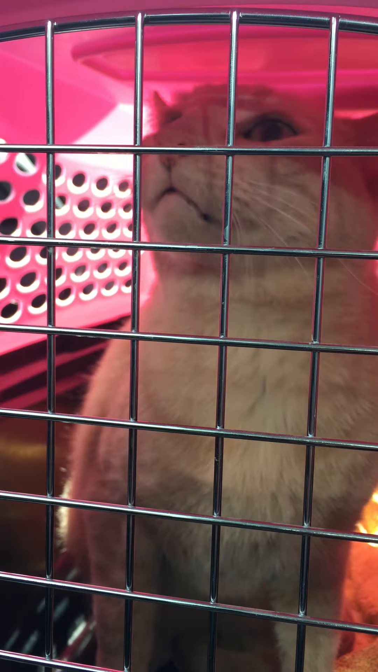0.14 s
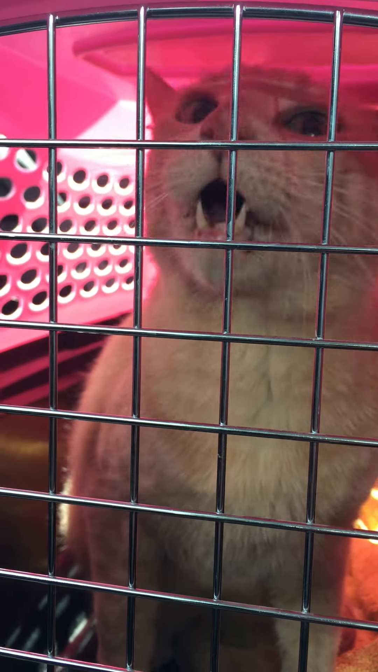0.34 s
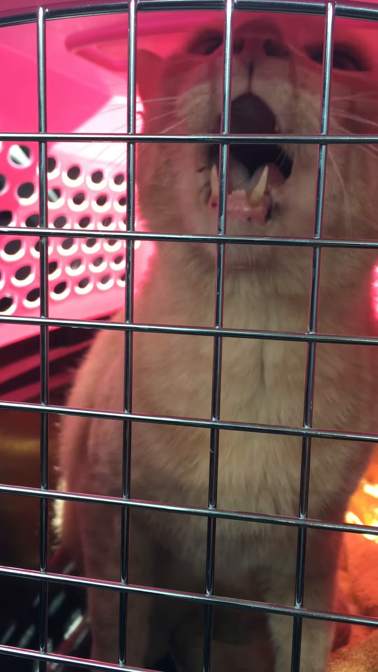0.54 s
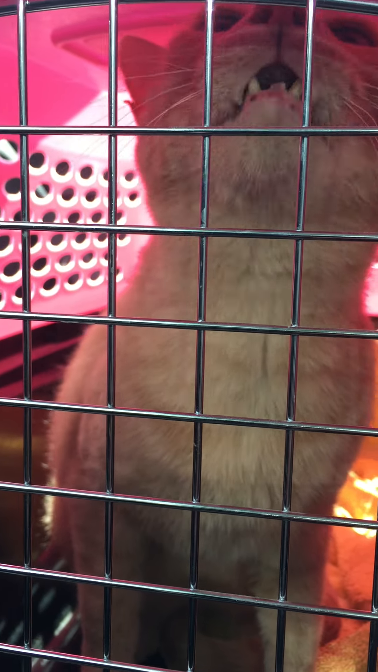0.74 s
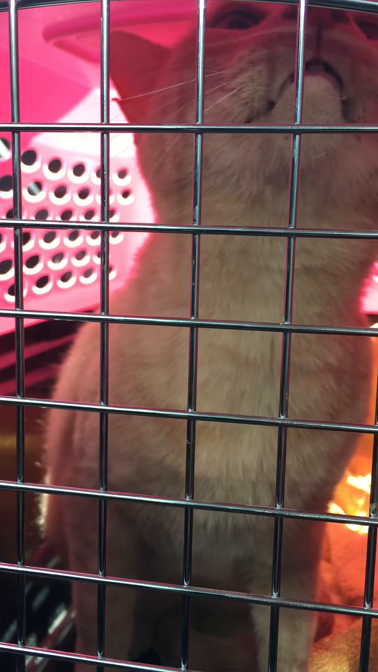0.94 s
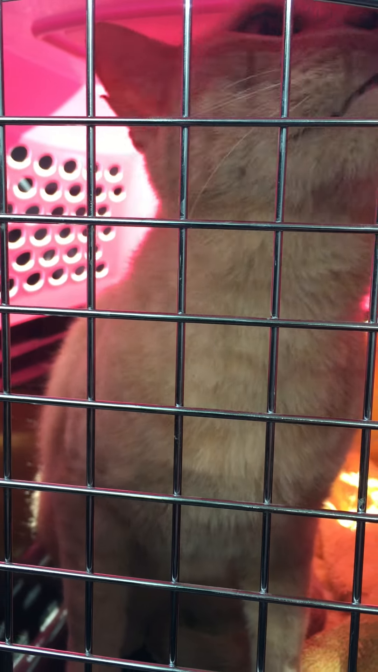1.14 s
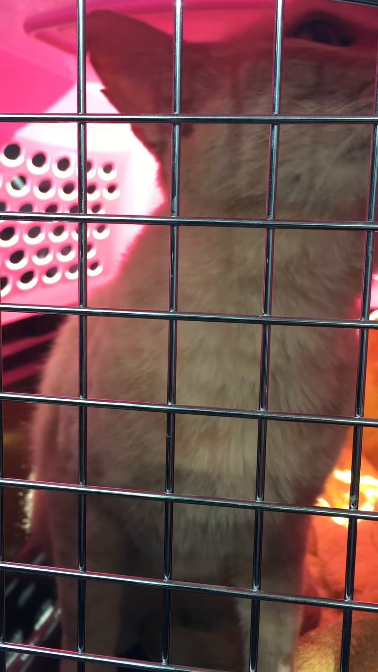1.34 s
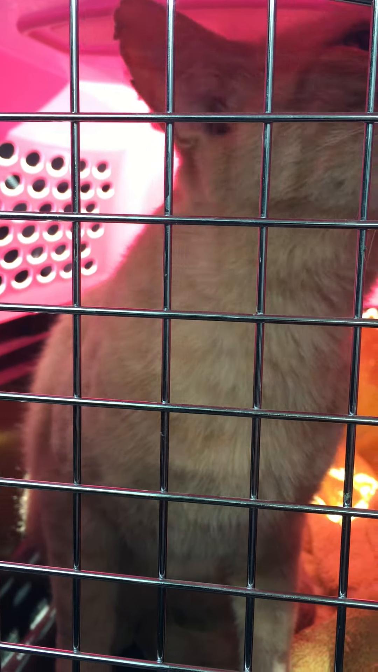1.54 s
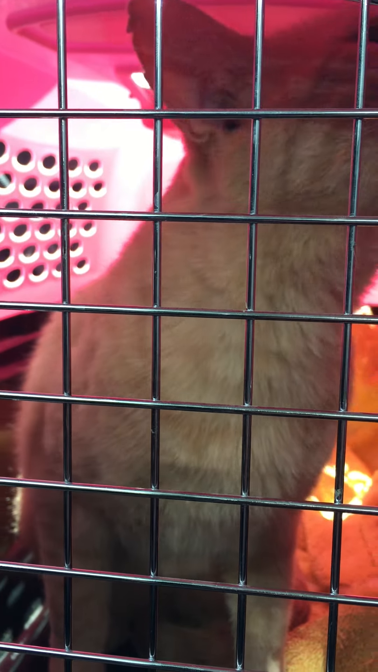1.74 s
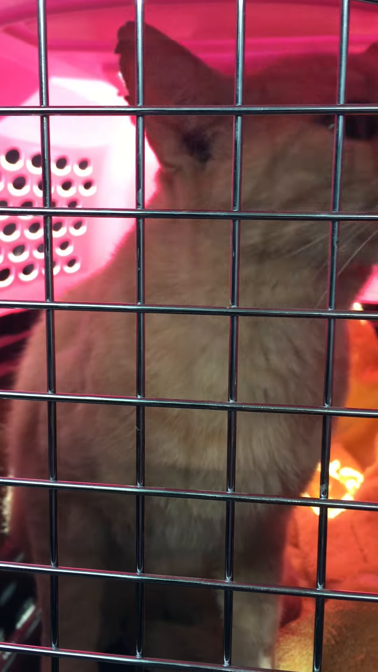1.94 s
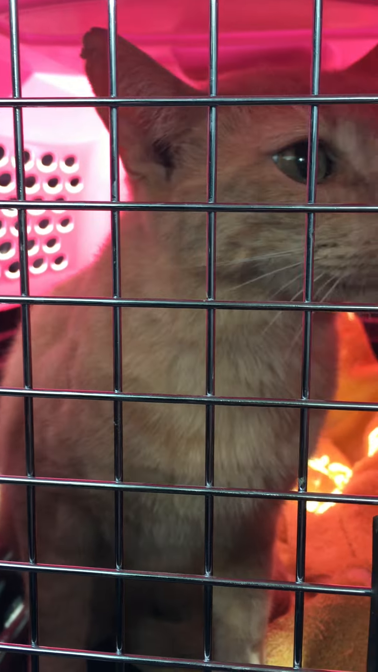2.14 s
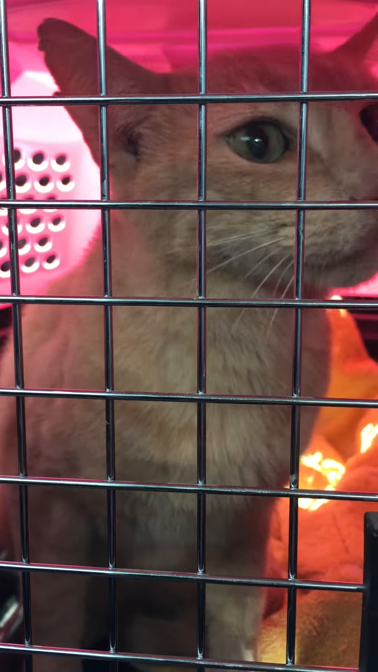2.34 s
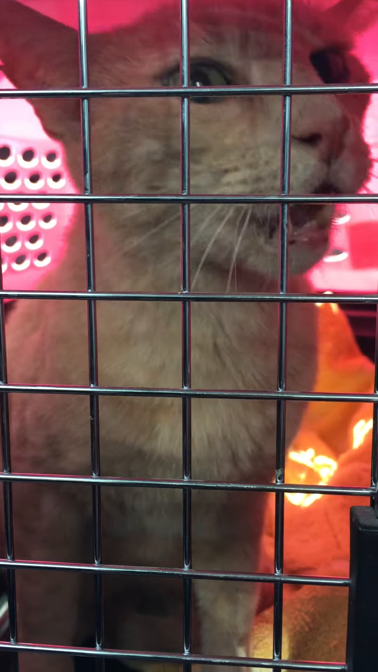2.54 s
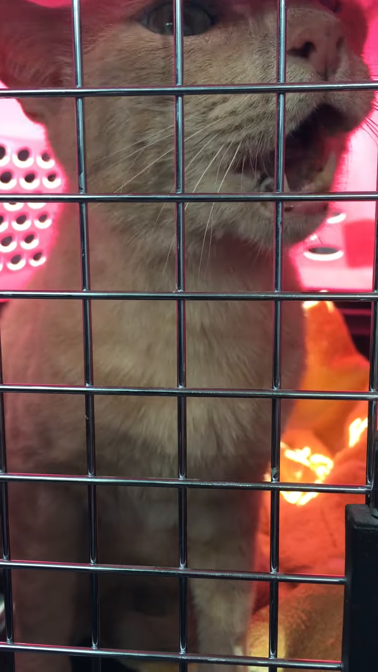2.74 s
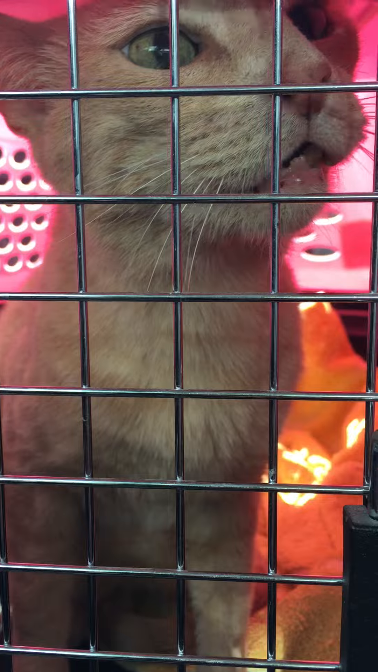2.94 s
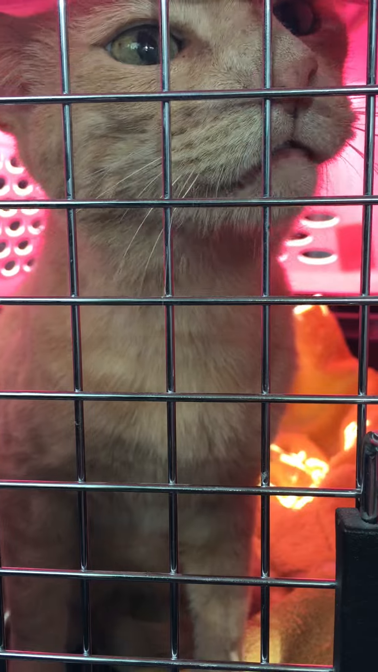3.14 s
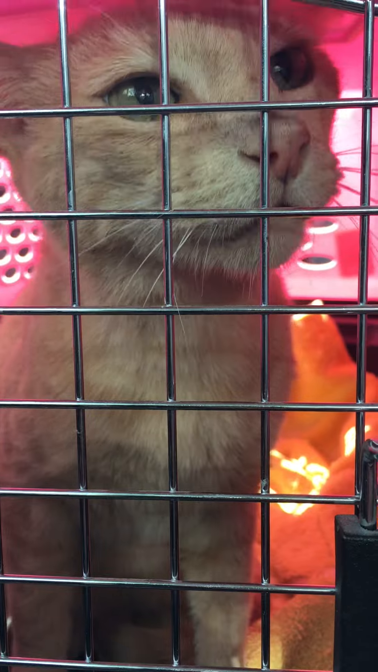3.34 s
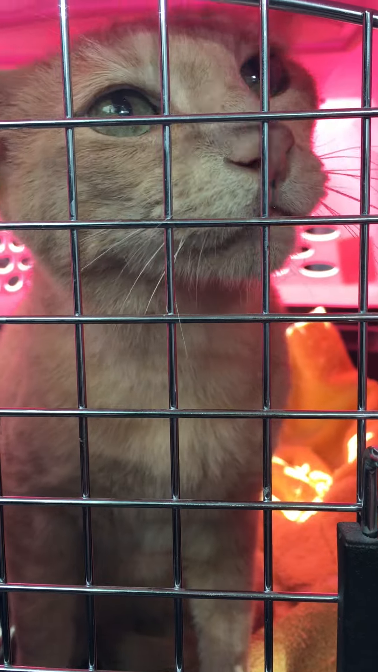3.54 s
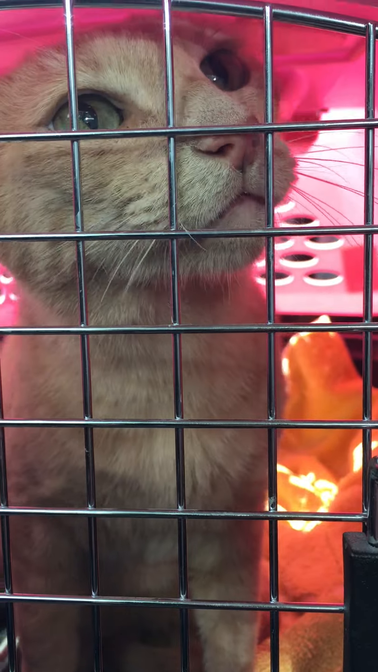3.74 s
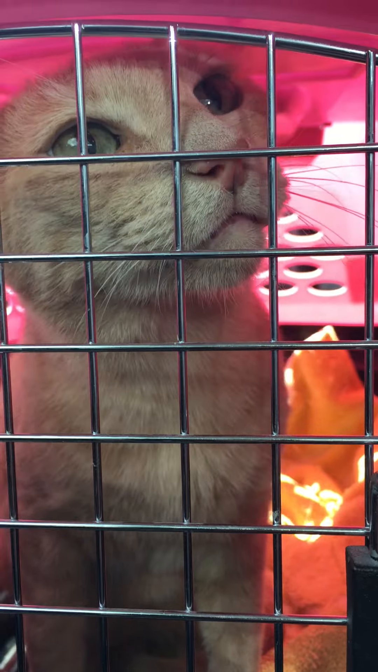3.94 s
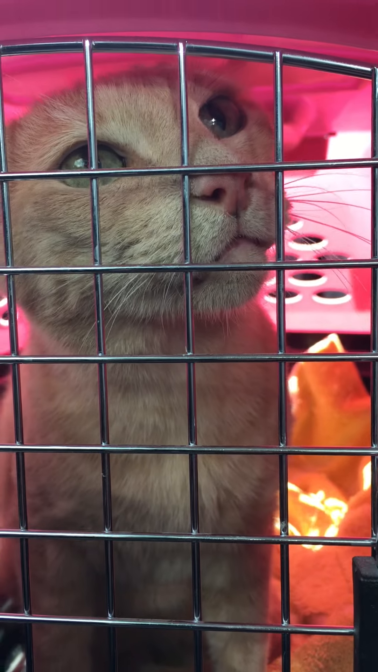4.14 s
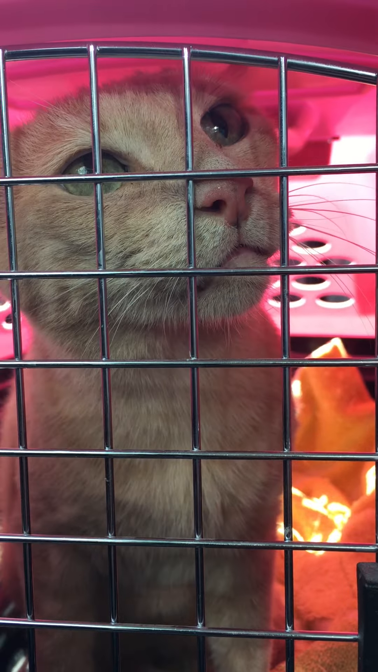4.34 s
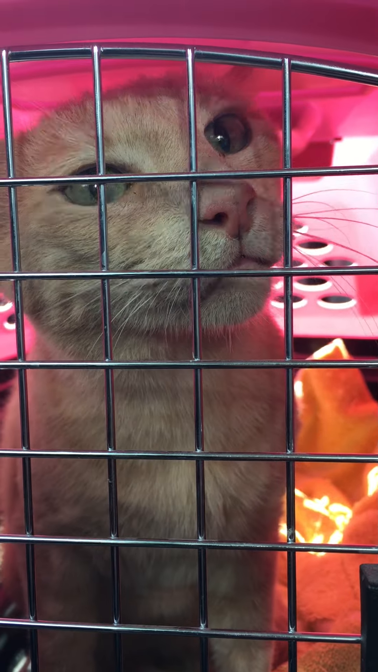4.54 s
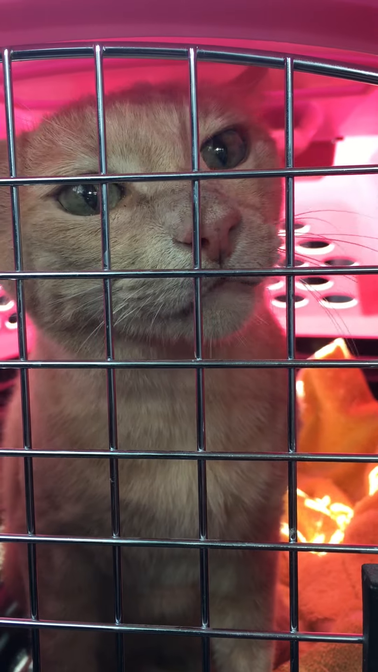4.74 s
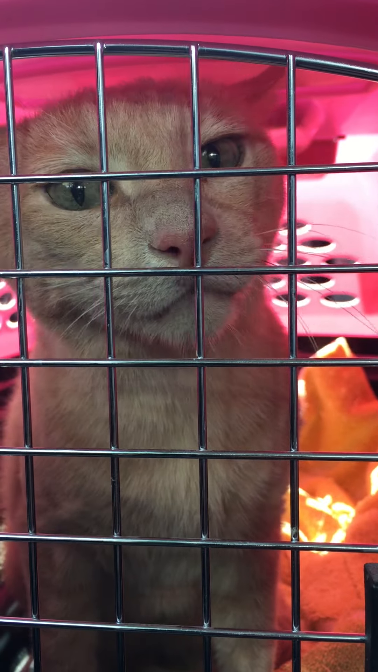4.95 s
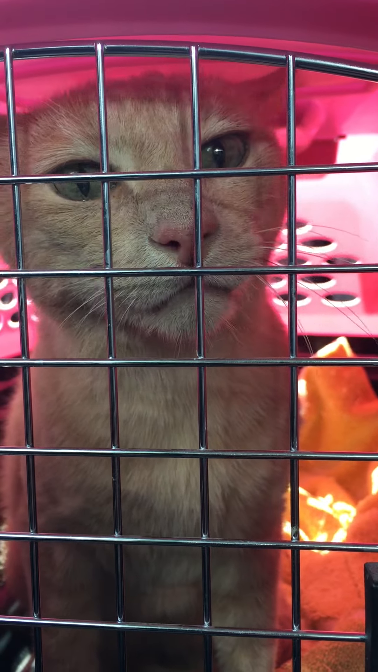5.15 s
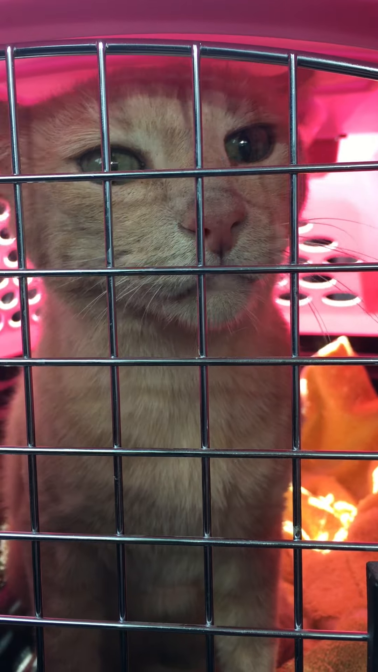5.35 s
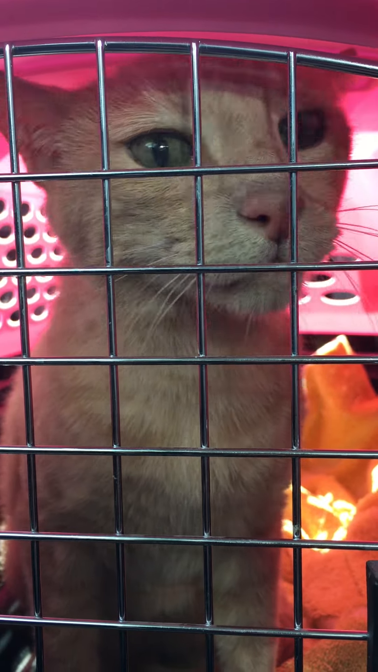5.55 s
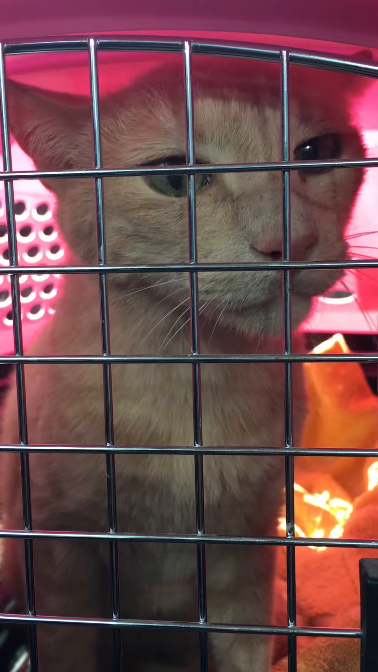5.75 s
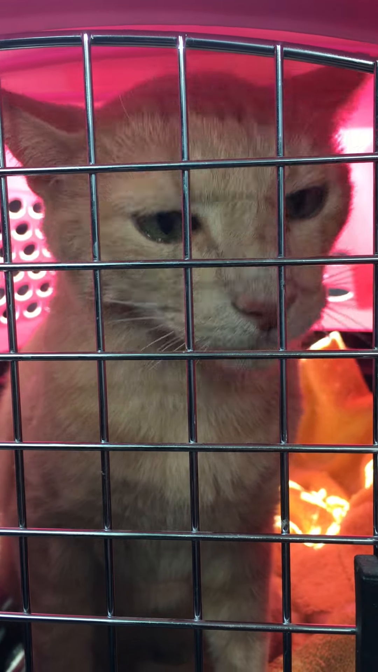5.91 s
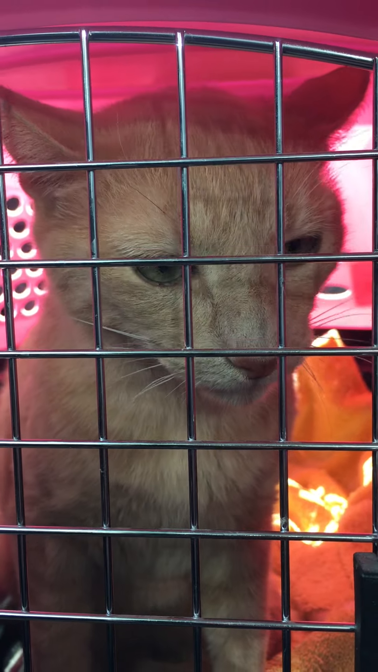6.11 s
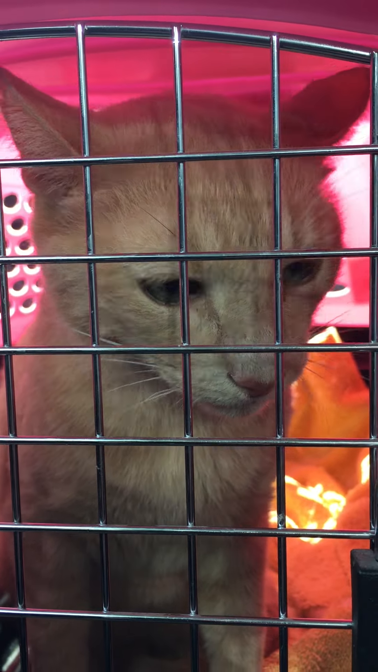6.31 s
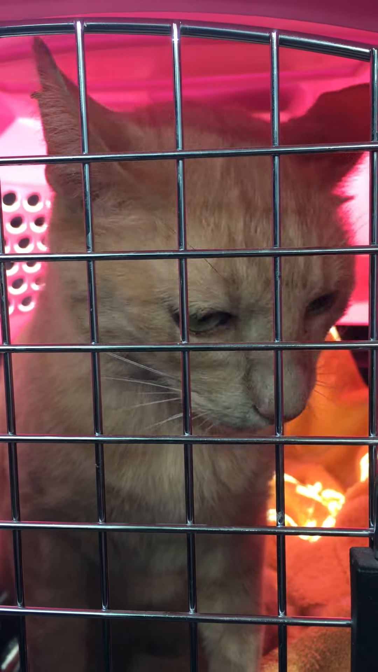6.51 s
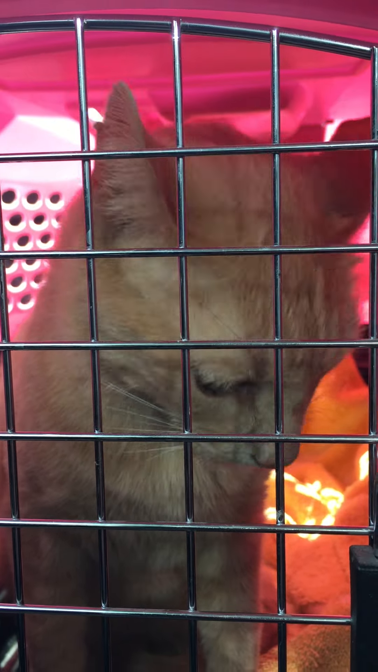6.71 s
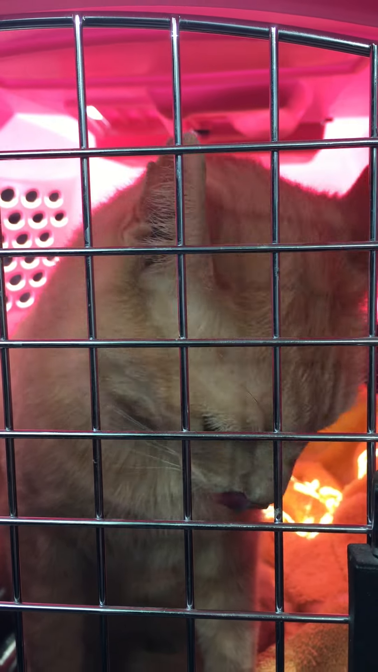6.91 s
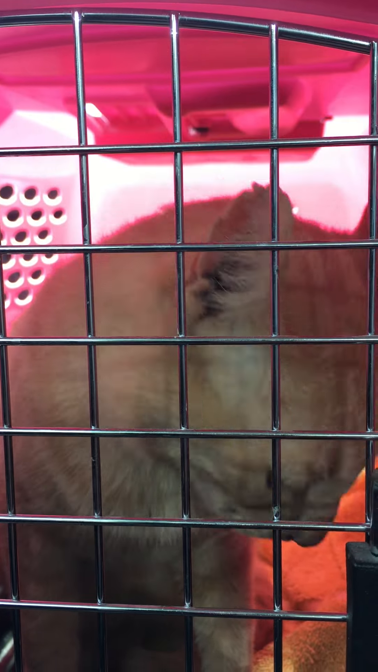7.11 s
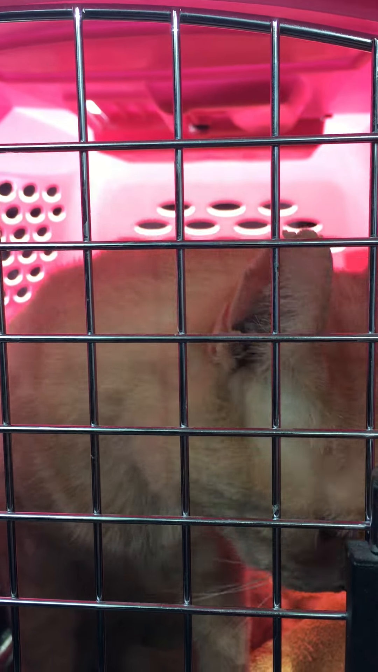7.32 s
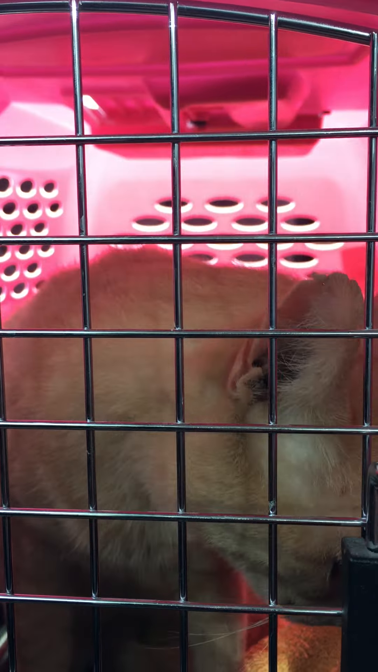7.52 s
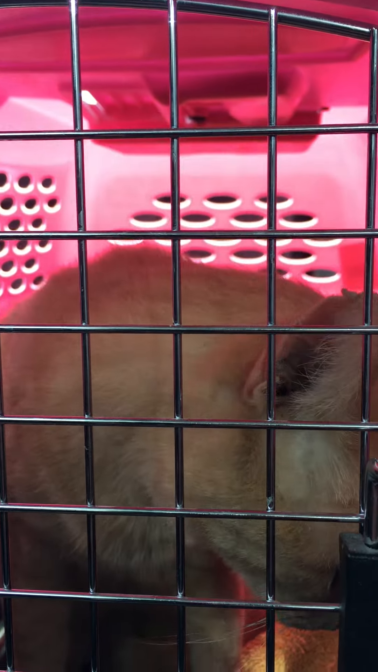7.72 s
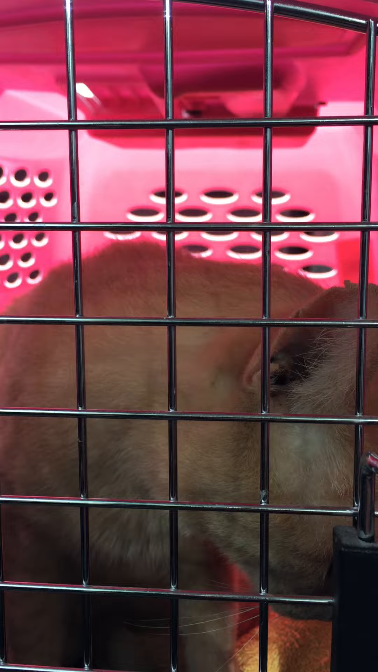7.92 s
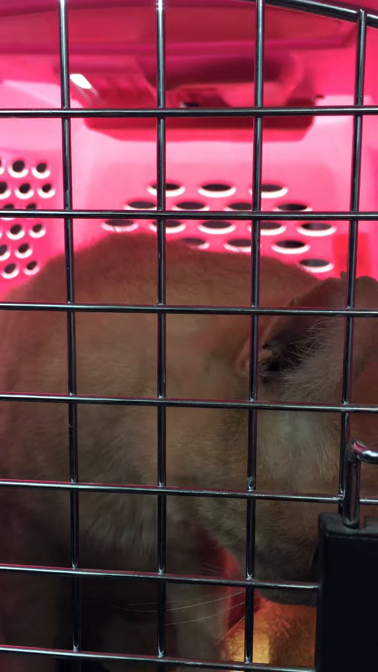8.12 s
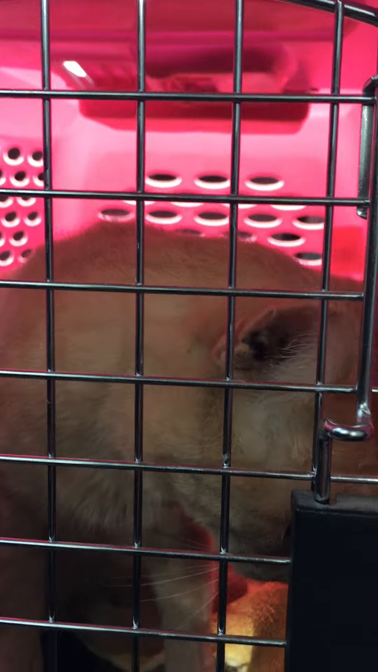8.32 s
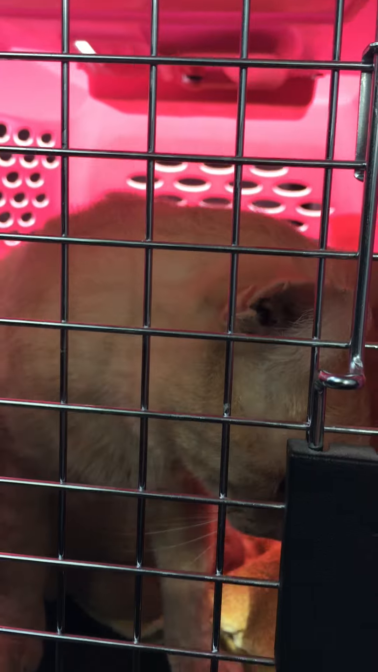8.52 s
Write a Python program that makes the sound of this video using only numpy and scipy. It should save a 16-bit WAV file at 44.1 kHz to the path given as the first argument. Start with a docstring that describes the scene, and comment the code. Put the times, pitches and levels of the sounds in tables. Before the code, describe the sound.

A cat howls three long meows from inside a plastic pet carrier, over a low, distant engine hum.

```python
"""Cat howling in a plastic carrier

Three howls: two head up, the third sinking into a corner that colours it. Each slides up in pitch
while jaw and lips sweep two mouth resonances over the vocal-fold harmonics. The walls echo briefly.
A distant engine idles under a steady outdoor wash. The recorder turns its gain down on loud sound."""
import sys
import numpy as np
from scipy import signal
from scipy.fft import rfft, irfft, next_fast_len
from scipy.io import wavfile
from scipy.ndimage import uniform_filter1d, map_coordinates

SR = 44100
rng = np.random.default_rng(int(sys.argv[2]) if len(sys.argv) > 2 else 0)


def digitize_waveform(pressure):
    """Quantize a signal to 16-bit integers and store it at the path in sys.argv[1].

    Rows of a 2-D input are taken as channels; values are limited to [-1, 1].
    """
    field = np.atleast_2d(pressure).T
    bounded = np.clip(field, -1, 1)
    quanta = np.round(bounded * 32767).astype(np.int16)
    wavfile.write(sys.argv[1], SR, quanta)


N = 382337


def cat():
    """Two howls towards the wire door, a third into a corner."""
    # pitch contours: time_s, pitch_hz
    first_pitch = [(0.41, 343.0), (0.481, 404.5), (0.561, 562.6), (0.606, 603), (0.67, 621.0),
                   (0.793, 600.8), (0.955, 604), (0.997, 596.3), (1.08, 610)]
    second_pitch = [(2.62, 355.6), (2.695, 393.0), (2.761, 528), (2.81, 598.5), (2.858, 623.3),
                    (2.964, 614.8), (3.108, 606), (3.264, 577.3), (3.34, 540.0)]
    head_down_pitch = [(7.19, 494), (7.225, 470), (7.298, 524), (7.371, 555.7), (7.485, 571),
                       (7.517, 564.6), (7.561, 578.4), (7.735, 589.3), (7.821, 580)]
    # howls: start_s, end_s, effort_db, attack_s, release_s, bright_db, jitter_ratio, ring_hz, ring_db
    howls = [(0.403, 1.105, -32.5, 0.15, .46, -41.5, .0013, 3050, 3.5),
             (2.613, 3.371, -31.5, 0.14, 0.18, -43, .0013, 7600, 3),
             (7.174, 7.958, -29.5, 0.45, 0.39, -57.5, .0008, 2900, 10)]
    # jaw and lip gestures: opens_s, closes_s, closing_s, jaw_wide_hz, spread_hz, rounded_hz
    gestures = [(0.514, 0.86, 0.093, 1742, 2934, 1300), (2.716, 3.042, 0.11, 1596, 2655, 1638),
                (7.317, 7.742, 0.089, 1132, 2106, 1944)]
    calls = zip(howls, (first_pitch, second_pitch, head_down_pitch), gestures)
    first, second, last = (howl(*call, rasp=0.0024, edge_rasp=0.13, air_db=-12.5) for call in calls)
    return first + second + corner(last)


def howl(call, melody, gesture, rasp, edge_rasp, air_db):
    """Fold harmonics through the moving mouth, a bright edge from sharp fold closure, and breath."""
    # low harmonics ahead of the mouth: freq_hz, gain_db
    larynx = [(350.0, -9.5), (600.0, -1.5), (1200.0, 7), (1800.0, 5), (2500.0, 3), (3200.0, -22),
              (4000.0, 11.5)]
    # breath turbulence: freq_hz, density_db
    turbulence = [(1500, -30), (3700, -18), (4600, -4), (6200, 6), (8200, -2), (9600, -17.5),
                  (11200, -13.5), (13000, -23), (15400, -22)]
    # voice cracks as the jaw closes: time_s, sag_hz
    all_cracks = [(0.882, 27.4), (3.05, 21.8)]
    # brief flares and falters: time_s, gain_db
    catches = [(.535, 1), (.555, -4.5), (.573, 1), (2.738, 3), (3.065, -3), (3.32, 6.5), (7.207, -21),
               (7.315, 5)]
    catch_s, shimmer_db, lips_muffle_hz = 0.01, 0.6, 1860
    start_s, end_s, peak_db, attack_s, release_s, bright_db, jitter, ring_hz, ring_db = call
    n = np.arange(int(start_s * SR), int(end_s * SR))
    t = n / SR
    cracks = [row for row in all_cracks if start_s < row[0] < end_s]
    pitch_hz = fold_pitch(t, end_s, melody, cracks)
    jaw, first_hz, second_hz = mouth_shape(t, cracks, *gesture)
    force_db = effort(t, start_s, end_s, attack_s, release_s)
    catches_db = sum(db * np.exp(-((t - at_s) / catch_s) ** 2) for at_s, db in catches)
    body_db = peak_db + force_db + catches_db
    slack = 1 + 1.4 * np.clip((560 - pitch_hz) / 150, 0, 1)  # slack folds beat unevenly at low pitch
    # shut jaw, slack folds and rounded lips dull the edge
    muffle_db = 6 * (1 - jaw) + 3.5 * (slack - 1) + 0.07 * np.maximum(lips_muffle_hz - second_hz, 0)
    edge_db = bright_db + 0.88 * force_db - muffle_db
    waver = lambda rate_hz: wobble(rate_hz, size=len(n))
    flutter = lambda rate_hz: waver(rate_hz) + 1j * waver(rate_hz)
    pitch_hz = pitch_hz * (1 + 0.0024 * waver(45.55) + jitter * slack * waver(260))
    phase = 2 * np.pi * np.cumsum(pitch_hz) / SR
    voice = np.zeros(N)
    for k in range(1, 37):
        hz = k * pitch_hz
        mouth = resonance(hz, first_hz, width_hz=153) * resonance(hz, second_hz, width_hz=142)
        body = amp(body_db + along(larynx, hz) + shimmer_db * slack * waver(40)) * mouth
        body *= 1 + rasp * slack ** 4 * flutter(520)
        colour_db = edge_colour(hz, second_hz, ring_hz, ring_db)
        edge = amp(edge_db + colour_db + 2.3 * np.sqrt(slack) * waver(31.1))
        edge = edge * (1 + edge_rasp * flutter(200))
        voice[n] += np.real((body + 1j * edge) * np.exp(1j * k * phase)) * (hz < SR / 2)
    hiss = noise(turbulence)[n] * (1 + np.cos(phase))  # one puff per fold cycle
    voice[n] += amp(edge_db + air_db + 2 * waver(25)) * hiss
    voice[n] *= signal.windows.tukey(len(n), 0.06)
    return voice


def fold_pitch(t, end_s, melody, cracks):
    """Fold rate in Hz: sags and snaps back at a crack, flicks up as the voice stops."""
    sag_s, snap_s, flick_s, flick_ratio = 0.035, 0.0059, 0.02, 0.26
    sag_hz = sum(hz * np.exp(-np.abs(at_s - t) / sag_s) * ease((at_s - t) / snap_s)
                 for at_s, hz in cracks)
    flick = 1 + flick_ratio * np.clip(1 - (end_s - t) / flick_s, 0, 1)
    return (np.interp(t, *np.transpose(melody)) - sag_hz) * flick


def effort(t, start_s, end_s, attack_s, release_s):
    """Vocal effort in dB re peak: swells, fades, gives out."""
    onset_db, fade_db, stop_db, stop_s = -18.5, -15.5, -13.5, 0.062
    onset = np.clip(1 - (t - start_s) / attack_s, 0, 1)
    fade = np.clip(1 - (end_s - t) / release_s, 0, 1)
    stop = np.clip(1 - (end_s - t) / stop_s, 0, 1)
    return onset_db * onset ** 2 + fade_db * fade ** 2 + stop_db * stop


def mouth_shape(t, cracks, opens_s, closes_s, closing_s, jaw_wide_hz, spread_hz, rounded_hz):
    """First resonance follows the jaw (0-1); the second leaps as the lips part, sinks as they round."""
    opening_s, jerk_s, jaw_shut_hz = 0.053, 0.014, 833
    parting_s, parting_hz = 0.029, 1860
    lead_s = sum(jerk_s * ease((t - at_s) / jerk_s) for at_s, _ in cracks)  # jaw jerks ahead at a crack
    jaw = ease((t - opens_s) / opening_s) * ease((closes_s - t - lead_s) / closing_s)
    first_hz = jaw_shut_hz + (jaw_wide_hz - jaw_shut_hz) * jaw
    rounding = np.linspace(0, 1, len(t)) ** 1.71
    lips_hz = spread_hz + (rounded_hz - spread_hz) * rounding
    second_hz = lips_hz + (parting_hz - lips_hz) * np.exp(-(t - t[0]) / parting_s)
    return jaw, first_hz, second_hz


def resonance(hz, centre_hz, width_hz):
    """Complex gain of a mouth resonance: flat below the peak, falling above."""
    return centre_hz ** 2 / (centre_hz ** 2 - hz ** 2 + 1j * hz * width_hz)


def edge_colour(hz, second_hz, ring_hz, ring_db):
    """Upper-harmonic gain in dB: set by mouth width, plus one favoured resonance."""
    # fold-closure spectrum by mouth width: freq_hz, narrow_db, wide_db
    edge_spectra = [(3300, -22, 7), (3970, -13, -10.5), (4370, -10.5, -15.5), (4540, 13.5, 7),
                    (5010, -5, 4.5), (5650, -5.5, 5.5), (6260, -3.5, 7), (7020, -9, -4.5),
                    (7700, -11, -4.5), (7880, -7.5, 3), (9800, -21.5, -26), (11000, -11.5, -16),
                    (12700, -28, -26), (15400, -23, -23)]
    narrow_hz, wide_hz = 1800, 2490
    width = np.clip((second_hz - narrow_hz) / (wide_hz - narrow_hz), 0, 1)
    freq_hz, *columns_db = np.transpose(edge_spectra)
    narrow_db, wide_db = (along(np.c_[freq_hz, db], hz) for db in columns_db)
    boost_db = ring_db * np.exp(-((hz / ring_hz - 1) / 0.16) ** 2)
    return (1 - width) * narrow_db + width * wide_db + boost_db


def corner(voice):
    """The head sinks into a corner: crossfade through three path colours."""
    # path gain by head position: freq_hz, turning_db, dipping_db, low_db
    paths = [(550, -8, -14.5, -22), (1090, 2, -2.5, -9), (1800, -3.5, 0, -5), (2177, -10.5, -19, -9),
             (2840, 13, 13, 9), (3500, 1, 9, 13), (4100, 4, 10.5, 3), (4710, -2, -16, 8),
             (5200, 20.5, -15, -14), (6580, 2, -17, 12), (7260, -2, 13.5, 13), (8200, -3, 7, 13.5),
             (9500, -3, 8, -8), (11200, 3, 4, 8), (13300, 0, -4, 3), (15200, -3, 1, 19)]
    freq_hz, *columns_db = np.transpose(paths)
    turning, dipping, low = (coloured(voice, np.c_[freq_hz, db]) for db in columns_db)
    t = np.arange(N) / SR
    dipped = np.interp(t, [7.315, 7.36], [0, 1])
    sunk = np.interp(t, [7.53, 7.61], [0, 1])
    return (1 - dipped) * turning + dipped * ((1 - sunk) * dipping + sunk * low)


def carrier(voice, low_db, high_db):
    """Two hard reflections and short, dense echoes off plastic walls, both stronger in the treble."""
    # echo decay: freq_hz, t60_s
    decay = [(400, 0.037), (2000, 0.15), (6000, 0.05), (14000, 0.015)]
    # first reflections: delay_s, gain
    walls = [(.00314, 0.15), (.005, 0.2)]
    freq_hz, t, spectra = signal.stft(rng.standard_normal(SR // 3), SR, nperseg=256)
    tail = signal.istft(spectra * amp(-60 * t / along(decay, freq_hz)[:, None]), SR, nperseg=256)[1]
    echoes = signal.fftconvolve(voice, tail / np.linalg.norm(tail))[:N]
    # gliding harmonics flare and fade across this comb
    comb = lambda hz: sum(gain * np.exp(-2j * np.pi * hz * delay_s) for delay_s, gain in walls)
    early = filtered(voice, lambda hz: comb(hz) * amp(along([(1900, -20.5), (3200, 0)], hz)))
    return early + coloured(echoes, [(2500, low_db), (5000, high_db)])


def engine(firing_hz, rumble_db):
    """Distant idle: slightly unsteady low orders over a dull rumble."""
    # engine orders: firing_multiple, level_db
    orders = [(1, -44.5), (2, -35.5), (3, -44), (4, -52.5), (5, -46.5), (5.5, -46), (6, -48)]
    # rumble spectrum: freq_hz, density_db
    rumble = [(22, -58), (31, -44), (40, -7.5), (62, -6), (78, -7), (92, -2), (119, -2.5), (141, -9),
              (162, -10.5), (198, -12.5), (240, -8.5), (290, -12.5), (450, -27.5), (900, -93)]
    phase = 2 * np.pi * np.cumsum(firing_hz * (1 + 0.0036 * wobble(2.91))) / SR
    hum = sum(amp(db + 2.27 * wobble(5)) * np.sqrt(2) * np.sin(order * phase + rng.uniform(0, 2 * np.pi))
              for order, db in orders)
    return hum + amp(rumble_db) * noise(rumble)


def outdoors(level_db):
    """Even wash of far-off noise, coloured by the hollow carrier."""
    # outdoor spectrum: freq_hz, density_db
    wash = [(240, -21), (400, -1), (520, -3.5), (700, -3), (1200, -8), (2000, -13), (3000, -16),
            (4500, -22), (6500, -25), (9200, -32), (10500, -40), (12500, -38.5), (15600, -43.5)]
    # carrier ripples: centre_hz, width_hz, gain_db
    ripples = [(1022, 52, 6.5), (1645, 145, 3.5), (2250, 90, 3.5), (3270, 270, 2.5), (4935, 134, -9),
               (5360, 110, 0.5), (6600, 150, 1.5), (7800, 420, -3.5), (10300, 200, -2.5), (11400, 220, 4)]
    ripple_db = lambda hz: sum(db * np.exp(-((hz - centre_hz) / width_hz) ** 2)
                               for centre_hz, width_hz, db in ripples)
    return amp(level_db) * unit(filtered(noise(wash), lambda hz: amp(ripple_db(hz))))


def gain_control(x, threshold_db, slope, recovery_db_per_s):
    """Loud sound cuts the gain at once; it creeps back."""
    level_db = 10 * np.log10(np.abs(uniform_filter1d(x ** 2, size=SR // 25)) + 1e-12)
    excess_db = np.maximum(level_db - threshold_db, 0)
    creep_db = recovery_db_per_s * np.arange(N) / SR
    cut_db = np.maximum.accumulate(slope * excess_db + creep_db) - creep_db
    return x * amp(-cut_db)


def amp(db):
    """dB to gain."""
    return 10 ** (np.asarray(db) / 20)


def unit(x):
    """x at rms 1."""
    return x / np.sqrt(np.mean(x ** 2) + 1e-20)


def ease(u):
    """Smooth 0-1 step around u = 0."""
    return 0.5 + 0.5 * np.tanh(u)


def along(points, hz):
    """(freq_hz, value) points read on a log frequency axis."""
    freq_hz, values = np.transpose(points)
    return np.interp(np.log(hz + 1), np.log(freq_hz + 1), values)


def wobble(rate_hz, size=N):
    """Smooth random curve, rate_hz knots a second."""
    knots = rng.standard_normal(int(size * rate_hz / SR) + 4)
    return map_coordinates(knots, [np.arange(size) * rate_hz / SR])


def filtered(x, response):
    """x through the gain response(hz)."""
    size = next_fast_len(N + SR // 2)
    return irfft(rfft(x, size) * response(np.fft.rfftfreq(size, 1 / SR)), size)[:N]


def coloured(x, curve):
    """x through a (freq_hz, gain_db) curve."""
    return filtered(x, lambda hz: amp(along(curve, hz)))


def noise(spectrum):
    """Coloured noise, rms 1."""
    return unit(coloured(rng.standard_normal(N), spectrum))


def scene():
    """Cat, carrier and background, mono."""
    voice = cat()
    echoes = carrier(voice, low_db=-21, high_db=-6)
    return (voice + echoes + engine(firing_hz=45.23, rumble_db=-34) + outdoors(level_db=-40.5))[None]


def record(dry):
    """Recorder: automatic gain, then a hard band limit."""
    top_hz = 15720
    held = gain_control(dry[0], threshold_db=-21.5, slope=0.36, recovery_db_per_s=10.8)
    return filtered(held, lambda hz: hz < top_hz)[None]


dry = scene()
out = record(dry)
digitize_waveform(out)
```